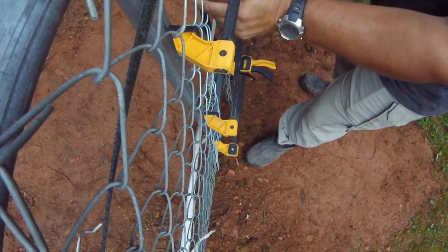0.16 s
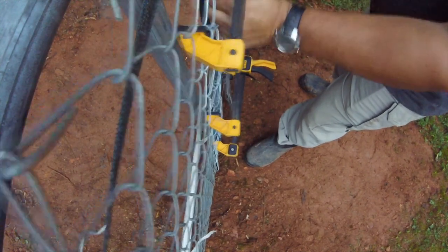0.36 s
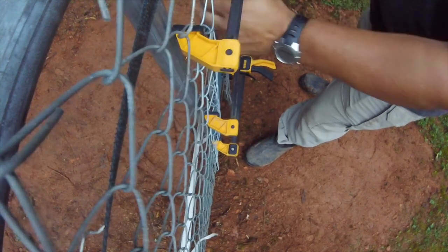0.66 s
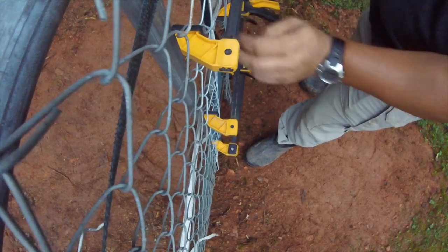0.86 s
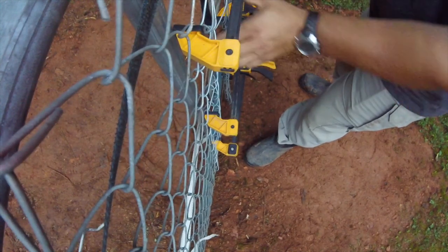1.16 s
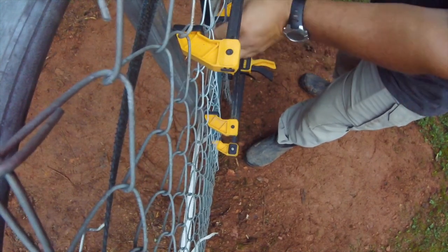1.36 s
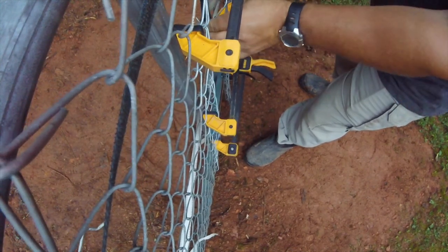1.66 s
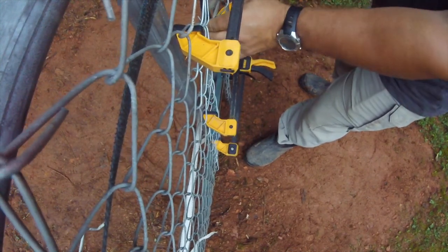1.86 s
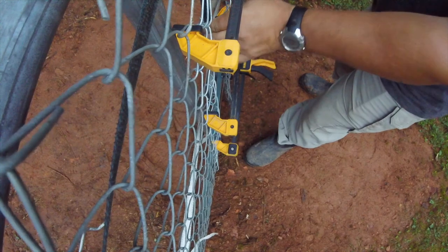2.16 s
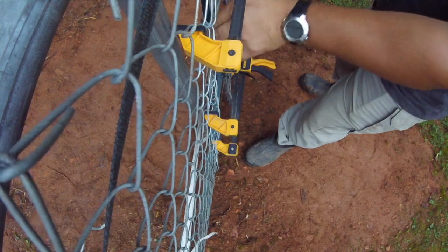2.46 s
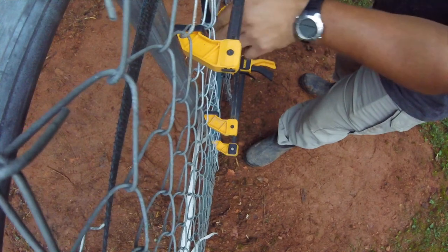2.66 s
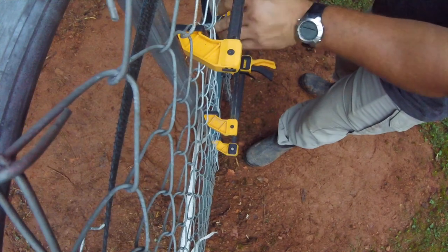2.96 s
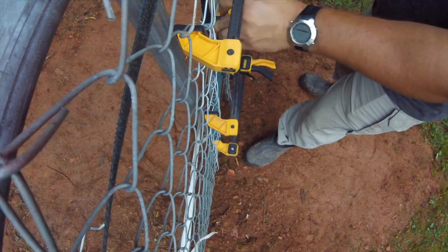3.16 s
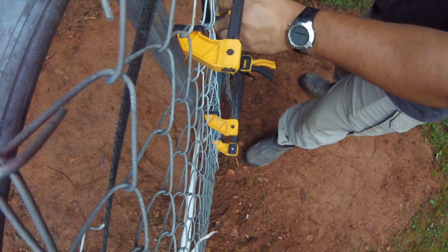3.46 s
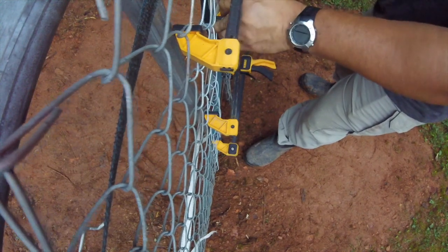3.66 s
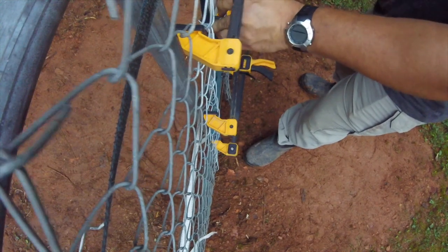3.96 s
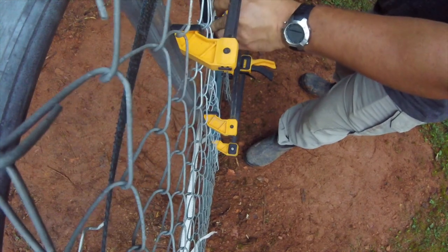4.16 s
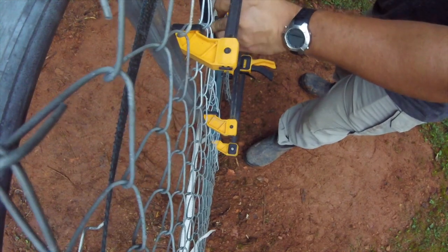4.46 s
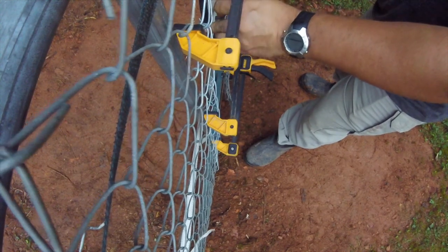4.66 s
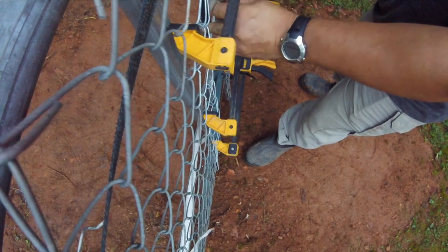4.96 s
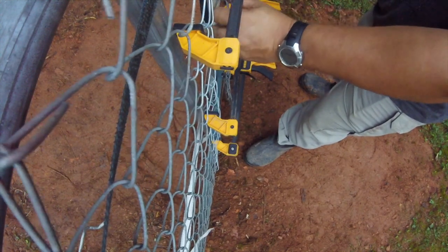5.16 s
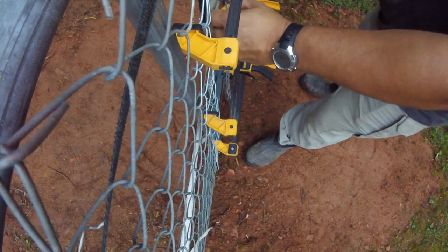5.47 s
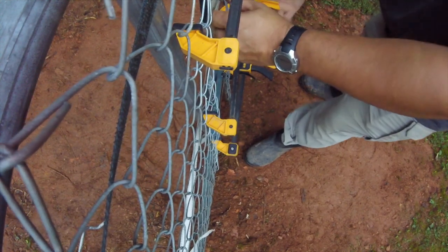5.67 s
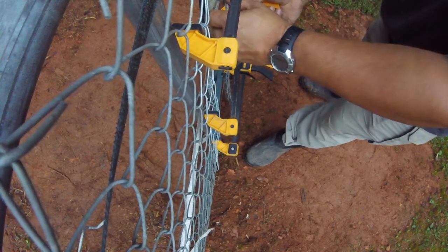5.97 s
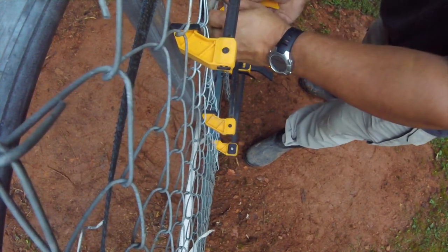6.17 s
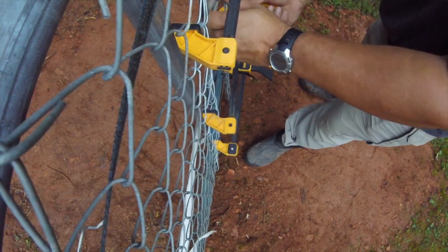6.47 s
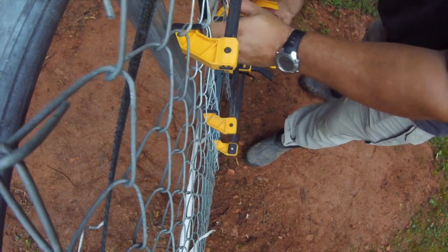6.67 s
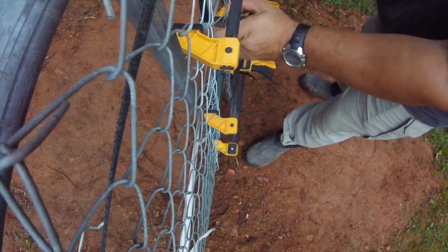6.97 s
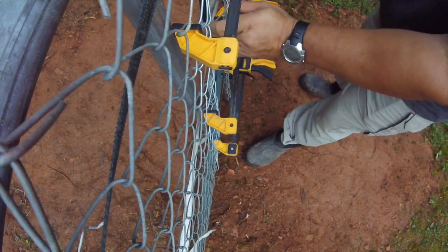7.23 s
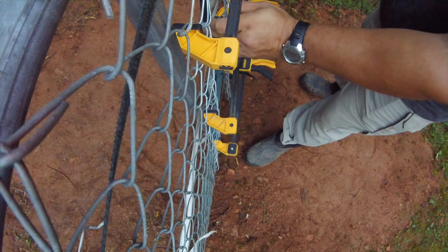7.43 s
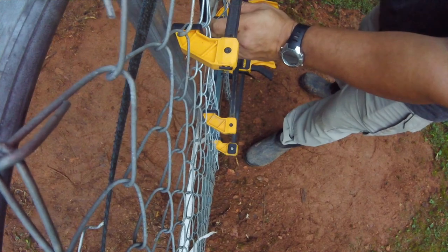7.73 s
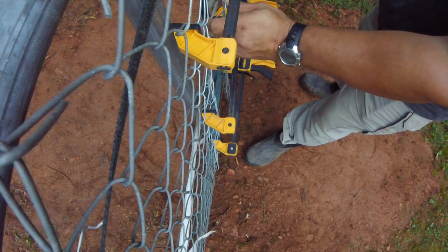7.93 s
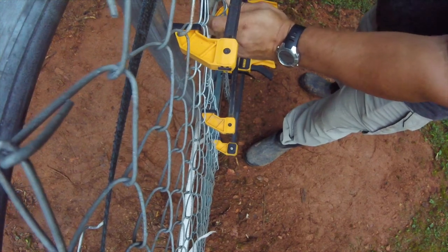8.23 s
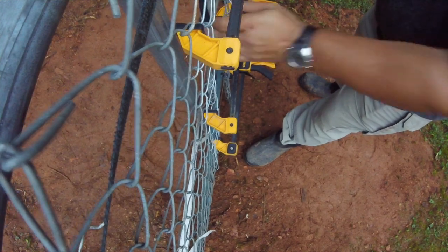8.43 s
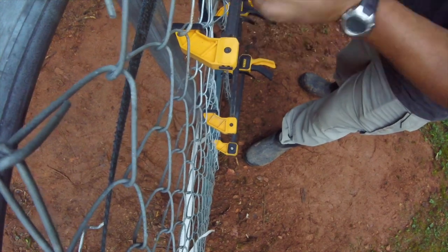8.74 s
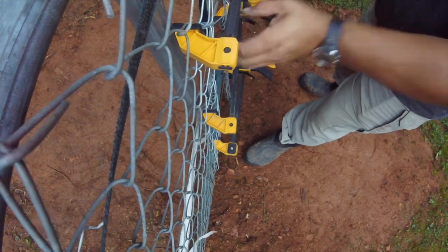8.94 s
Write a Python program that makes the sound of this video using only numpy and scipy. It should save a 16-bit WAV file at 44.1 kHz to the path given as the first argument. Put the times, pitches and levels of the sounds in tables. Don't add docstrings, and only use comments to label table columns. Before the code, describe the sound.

A hand jerks a wire mesh fence with a loud rattling clank and brief metallic ring, then scattered plastic clamp knocks, scrapes and low thumps follow.

```python
import sys
import numpy as np
from scipy import signal
from scipy.fft import rfft, irfft, next_fast_len
from scipy.io import wavfile
from scipy.ndimage import uniform_filter1d

SR = 44100
rng = np.random.default_rng(int(sys.argv[2]) if len(sys.argv) > 2 else 0)


def invert_db(x):
    u = np.asarray(x, float) / 20
    return 10 ** u


def put_to_file(sound):
    columns = np.atleast_2d(sound).T
    safe = np.clip(columns, -1, 1)
    whole_steps = np.round(safe * 32767)
    wavfile.write(sys.argv[1], SR, whole_steps.astype(np.int16))


N = 401310

# t/s, motion level/dB, rubbing level/dB
HANDS = [(0.0, -51, -75.5), (0.33, -38, -51), (0.61, -50, -67), (1.1, -56.5, -76), (1.67, -64, -77),
         (2.2, -54.5, -80.5), (2.56, -55.5, -78), (3.22, -57.5, -73.5), (3.6, -62.5, -81.5),
         (4.1, -54, -71.5), (4.55, -51, -76), (5.0, -57.5, -77.5), (5.65, -60, -75), (6.5, -48, -71),
         (7.2, -54.5, -77), (7.95, -50, -73.5), (8.45, -45, -70), (9.1, -50, -71)]
# t/s, depth/dB
PAUSES = [
    (3.4, 23),
    (4.0, 6.5),
    (4.68, 14),
    (6.92, 9.5),
    (7.33, 10.5),
    (7.83, 17),
]
# t/s, sway level/dB, post hum level/dB
PULLS = [(0.02, -33.5, -56), (0.33, -33.5, -49), (0.43, -34.5, -51.5), (0.9, -49.5, -72),
         (1.541, -48.5, -62), (1.86, -58.5, -70.5), (2.03, -56, -72), (2.291, -43.5, -71),
         (2.37, -42.5, -61), (2.71, -61, -65), (3.72, -48.5, -78), (3.95, -48, -63.5), (4.33, -57, -76),
         (4.51, -51, -62), (4.78, -67, -62.5), (4.887, -41, -55), (5.12, -49.5, -73), (5.35, -44.5, -73),
         (5.872, -40, -60.5), (6.13, -64, -76), (6.26, -42.5, -78), (6.362, -54, -61), (6.69, -62, -87),
         (7.632, -39, -86), (7.891, -41, -55), (8.138, -38, -58), (8.354, -33.5, -49.5), (8.52, -43.5, -54),
         (8.76, -44, -63), (9.0, -38, -61)]
# f/Hz, width/Hz, level/dB
SWAY_MODES = [(42, 27, -10), (66.5, 20.9, 2), (80, 29.5, 1.5), (114.8, 24.4, -3.5), (159.4, 35.7, -9.5)]
# f/Hz, width/Hz, level/dB
RUB_MODES = [(425.5, 42.3, -3), (650, 48, -12.5), (784, 100, -12), (929.4, 51, 0.5), (1039, 45, 2),
             (1141, 44, -10.5), (1241, 52, -3), (1590, 500, -23), (1900, 160, -15)]
# t/s, peak level/dB, f/Hz
JOLTS = [(0.243, -30, 93), (0.321, -22, 99), (2.282, -44, 89.6), (3.538, -43, 102), (5.836, -32.5, 61),
         (5.887, -35.5, 78.4), (6.228, -37.5, 80.6), (6.66, -38.5, 87), (6.955, -39.5, 81),
         (7.421, -36.5, 86.5), (7.512, -33, 83), (7.699, -34, 86.7), (8.107, -32, 102.3),
         (8.328, -24, 87.3), (8.374, -22, 99.7), (8.43, -37.5, 80.7), (8.476, -29, 79)]
# t/s, peak level/dB, brightness/dB, t60/s
SCUFFS = [(0.0, -53.5, -14, 0.28), (0.5, -61.5, -11, 0.2), (0.277, -47.5, -16, 0.18),
          (0.307, -43, -14, 0.15), (0.333, -32, -33, 0.056), (0.358, -43.5, -8, 0.06),
          (0.404, -30.5, -29, 0.087), (0.424, -38, -21, 0.03), (2.282, -59.5, -10, 0.21),
          (2.689, -65, -9, 0.24), (2.39, -57, -8.5, 0.066), (2.468, -63.5, -33, 0.1),
          (4.518, -60, -24, 0.29), (5.192, -62.5, -9, 0.25), (4.83, -65, -18, 0.062),
          (3.089, -67.5, -27, 0.23), (5.832, -55.5, -11, 0.078), (5.892, -66, -8, 0.28),
          (6.4, -41, -9.5, 0.14), (6.425, -49, -26, 0.3), (7.527, -61.5, -17, 0.093),
          (7.88, -55, -20, 0.36), (8.078, -50, -19, 0.32), (8.156, -54, -27, 0.07),
          (8.332, -50, -13.5, 0.31), (8.375, -44, -23, 0.19), (8.464, -48.5, -17.5, 0.19),
          (8.593, -55, -20, 0.26), (8.745, -60.5, -8, 0.29), (9.002, -58, -15.5, 0.25),
          (0.215, -58, -15, 0.17), (2.322, -62, -15, 0.092), (4.115, -64, -18, 0.17),
          (4.455, -60, -22, .12), (4.56, -63, -22, 0.092), (5.775, -64.5, -12, .2), (5.91, -65, -22, .2),
          (6.41, -51, -7.5, 0.19), (7.406, -67, -12, 0.14), (7.625, -62, -15, .15), (7.67, -65, -14, 0.13),
          (7.93, -60, -16, 0.18), (9.08, -57.5, -13, .1)]
# f/Hz, level/dB per Hz
SCRAPE_SPECTRUM = [(1100, -22), (1500, 8), (1850, 6), (3000, -5), (4200, -15.5), (5200, -4), (7000, -20.5),
                   (12000, -50)]
# f/Hz, level/dB per Hz
YARD_SPECTRUM = [(12, -39.5), (30, -1.5), (70, 1.5), (127, -1), (206, -21.5), (275, -10), (367, -32),
                 (540, -33.5), (1040, -29.5), (1410, -35.5), (2000, -55.5), (4400, -120)]
# f/Hz, level/dB per Hz
HISS_SPECTRUM = [(1200, -29), (1800, -3.5), (3000, -5.5), (4500, -10.5), (4850, -4.5), (6600, -7.5),
                 (8000, -6), (9600, -14.5), (11000, -13), (13400, -13.5), (15000, -46)]
# start t/s, end t/s, f/Hz, level/dB
CRICKETS = [(1.45, 1.8, 4240, -96), (2.65, 3.0, 4240, -93), (3.27, 3.648, 4270, -94),
            (3.3, 3.596, 4000, -95), (3.93, 4.35, 4170, -93), (4.583, 4.92, 4310, -91),
            (5.896, 6.297, 4310, -86.5), (7.38, 7.67, 4110, -92), (7.47, 7.64, 3870, -94),
            (7.67, 7.82, 4000, -90), (7.69, 7.95, 4320, -89), (8.64, 8.76, 4150, -92)]
# t/s, peak level/dB, colour f/Hz
SLIPS = [(0.2293, -60, 6860), (0.307, -48.5, 5100), (0.3288, -33, 7300), (0.351, -48, 5200),
         (0.372, -49, 5000), (0.388, -47, 5530), (0.4064, -36.5, 7100), (0.419, -44.5, 7260),
         (0.488, -57, 5410), (0.657, -57.5, 6460), (0.812, -57, 5330), (0.857, -62.5, 5850),
         (1.055, -65, 5500), (1.446, -60, 6400), (2.405, -61, 7500), (2.67, -56.5, 5000),
         (2.7105, -66, 4630), (3.0807, -68, 6510), (4.5241, -67, 6520), (5.198, -62, 5580),
         (5.4786, -63, 6580), (5.769, -63, 6440), (5.838, -63.5, 6400), (6.403, -62, 5200),
         (8.083, -57.5, 5800), (8.3686, -54, 5040), (8.457, -56, 5360), (8.5867, -58, 5330),
         (8.74, -58, 5200), (8.8975, -62.5, 5330), (8.996, -63.5, 4920), (9.0714, -64, 6370),
         (0.4385, -58, 6400), (0.472, -61, 7300), (0.525, -65, 4000), (0.58, -71, 5000), (0.725, -69, 4000),
         (0.99, -73, 4000), (1.039, -67, 4840), (1.147, -70, 5400), (1.22, -74, 5000), (1.3489, -70, 6380),
         (1.551, -72, 4000), (7.525, -69, 4600), (7.91, -69, 4500)]
# t/s, peak level/dB, colour f/Hz
SNAPS = [(1.5953, -69, 2640), (2.106, -64, 4770), (2.8726, -66, 4860), (3.652, -63.5, 1660),
         (4.15, -68, 5420), (4.202, -64, 3900), (5.0426, -65, 1890), (5.661, -70, 1660), (5.82, -61, 4300),
         (6.1838, -66, 1800), (6.56, -64.5, 1900)]
# f/Hz, level/dB per Hz
RUSTLE_SPECTRUM = [(1760, -4.5), (3000, -9.5), (4240, -16), (5220, -0.5), (6420, -1), (7740, -4),
                   (11100, -17.5), (14400, -56), (22000, -120)]
# t/s, peak level/dB, brightness/dB
BUMPS = [(0.218, -53, -21), (0.278, -38, -20), (2.282, -58, -11), (2.323, -49.5, -23), (2.377, -55, -16),
         (2.393, -52, -17), (2.462, -62, -13), (2.471, -53.5, -20), (2.523, -64, -21), (5.844, -56, -22),
         (5.89, -63, -22), (7.992, -62, -19), (8.088, -50, -19), (8.162, -48, -27), (8.184, -61, -26),
         (8.245, -56, -20), (8.287, -58, -17), (8.336, -44, -23), (8.377, -41, -20), (8.389, -40, -24),
         (8.451, -54, -19), (8.464, -46, -21), (8.539, -57, -21), (8.593, -52, -20), (8.741, -54, -12),
         (8.905, -60, -15), (8.94, -56, -25), (9.003, -56, -22), (9.08, -56, -13)]
# f/Hz, level/dB, t60/s
BUMP_LOW_MODES = [(149, -4, 0.025), (270, -2, .1), (428, 0, .08), (810, -3.5, .04), (927, -9.5, .04),
                  (1052, -6, .05)]
# f/Hz, level/dB, t60/s
BUMP_HIGH_MODES = [(1510, 6, .02), (1850, 4, .05), (1970, -10, 0.036), (2450, -5, .02)]
# t/s, peak level/dB, brightness/dB, low push/dB
KNOCKS = [(0.329, -32.5, -21, 6), (0.3992, -33, -10, 7), (0.424, -39, -5.5, 13), (0.872, -44, -17, -14),
          (1.437, -48, -18, 3), (4.051, -38.5, -13, 2), (4.21, -52, -22, 11.5), (4.306, -43.5, -13, 10),
          (4.494, -38.5, -15, 5.5), (4.887, -38, -17, -6), (5.059, -44.5, -14.5, 10),
          (5.345, -34, -14, 4.5), (5.967, -43, -22.5, 6.5), (6.046, -37, -14, 2), (6.136, -42, -15, 6),
          (6.267, -51, -25, -8), (6.354, -34.5, -13, 2), (6.387, -45, -21, 12.5), (7.11, -43.5, -18, 7.5),
          (7.863, -39, -14.5, 3.5)]
# f/Hz, level/dB, t60/s
HOUSING_MODES = [(271.6, -6, 0.23), (430, 0, 0.1), (570, -2.5, 0.048), (703, -8, 0.04), (770, -10.5, 0.064),
                 (942.5, 7, 0.042), (1030, -20.5, 0.085), (1157, -33, 0.1), (1196, -22, 0.094)]
# f/Hz, level/dB, t60/s
CLAMP_MODES = [(1607, 4, 0.028), (1788, 5.5, 0.038), (1900, -25, 0.024), (2420, -4.5, 0.017),
               (2760, -10, 0.045), (2913, 11, 0.017), (2763, -22, 0.22), (3000, 4.5, 0.01),
               (3660, -9, 0.015)]
# t/s, low ring level/dB, high ring level/dB
BAR_HITS = [
    (0.3296, -62, -43),
    (0.361, -60, -60),
    (0.4066, -72, -47),
    (0.4255, -55, -56),
]
# f/Hz, level/dB, t60/s
BAR_LOW_MODES = [(2676, 0, .62), (2686, -1, .2), (2795, -9, .1), (3040, -14, .1), (3316, -12, .07)]
# f/Hz, level/dB, t60/s
BAR_HIGH_MODES = [(5216, -12, .1), (5620, -20, .12), (6455, -19, .15), (6713, -19, .12), (7187, -11, .07),
                  (7546, 0, .26), (7526, -2, .1), (7650, -8, .12), (7790, -13, .1), (8317, -11, .08),
                  (8484, -19, .12), (9706, -15, .06)]
# t/s, peak level/dB, f/Hz
TAPS = [(0.995, -73, 660), (1.065, -69.5, 640), (1.192, -72, 660), (1.529, -71, 660), (1.573, -76, 402),
        (2.03, -74, 665), (2.179, -71, 428), (2.612, -69, 428), (3.877, -70, 650), (4.735, -71, 650),
        (8.251, -65, 437), (5.846, -58, 430), (5.892, -58.5, 430), (5.9, -55, 275), (2.285, -47, 135),
        (2.38, -65, 830), (2.522, -77, 1000), (6.105, -79, 1800), (6.37, -58, 270), (5.84, -70, 1890),
        (4.2, -72.5, 1800), (5.352, -54, 428), (6.05, -63, 430)]
# t/s, peak level/dB, f/Hz
PINGS = [
    (4.4, -88, 2800),
    (6.67, -88, 2770),
    (8.42, -83.5, 2720),
    (8.555, -82, 2700),
]

PULL_RISE_DB_PER_S, SWAY_FALL_DB_PER_S, HUM_FALL_DB_PER_S = 264, 177.5, 82
HUM_BELOW_MOTION_DB, PAUSE_HALF_S = 18, 0.13
JOLT_T60_S = 0.16
SHIVER_DB, SHIVER_BRIGHT_DB, SHIVER_T60_S = -16, -17.5, 0.11
YARD_DB, HISS_DB, CHORUS_DB = -62, -85.5, -87.5
CRICKET_RISE_HZ_PER_S = 200.0
RUSTLE_DB, CALM_FROM_S, CALM_TO_S, CALM_DB = -77.5, 0.73, 2.6, 24
WIRE_RING_DB, WIRE_RING_T60_S = -17, 0.05
SQUEAK_S, SQUEAK_LENGTH_S, SQUEAK_HZ, SQUEAK_DB = 4.418, 0.066, 1120, -65.5


def seconds(length):
    return np.arange(length) / SR


def rms_one(x):
    return x / np.sqrt(np.mean(x ** 2) + 1e-20)


def in_time(rows):
    s, *columns = np.transpose(rows)
    return [np.interp(seconds(N), s, c) for c in columns]


def drift(rate_hz):
    r = np.exp(-80 * np.pi * rate_hz / SR)
    noise = rng.standard_normal(N // 40 + 2002)
    slow = signal.lfilter([1], [1, -2 * r, r * r], noise)[2000:]
    return np.interp(np.arange(N) / 40, np.arange(len(slow)), rms_one(slow))


def ring(clicks, hz, t60_s):
    r = invert_db(-60 / (t60_s * SR))
    w = 2 * np.pi * hz / SR
    return signal.lfilter([0, np.sin(w)], [1, -2 * r * np.cos(w), r * r], clicks + 1e-18)


def resonate(x, hz, width_hz):
    r = np.exp(-np.pi * width_hz / SR)
    zeros = np.array([1, 0, -1]) * (1 - r * r) / 2
    return signal.lfilter(zeros, [1, -2 * r * np.cos(2 * np.pi * hz / SR), r * r], x)


def lowpass(x, hz, order):
    return signal.sosfilt(signal.butter(order, hz, fs=SR, output="sos"), x)


def coloured(spectrum):
    hz, level_db = np.transpose(spectrum)
    size = next_fast_len(N)
    bins_hz = np.maximum(np.arange(size // 2 + 1) * SR / size, 1)
    shape = invert_db(np.interp(np.log(bins_hz), np.log(hz), level_db))
    return rms_one(irfft(rfft(rng.standard_normal(size)) * shape, size)[:N])


def grains(per_s, spread_db):
    sizes = invert_db(spread_db * np.minimum(rng.exponential(1, N), 5))
    signs = rng.choice([-1, 1], N)
    return sizes * signs * (rng.random(N) < per_s / SR)


def strike(times, peak_db, modes, scatter_db):
    at = np.round(np.array(times) * SR).astype(int)
    luck = rng.standard_normal((len(at), len(modes)))
    out = np.zeros(N)
    for k, (hz, level_db, t60_s) in enumerate(modes):
        clicks = np.zeros(N)
        clicks[at] = invert_db(np.array(peak_db) + level_db + scatter_db * luck[:, k])
        out += ring(clicks, hz, t60_s)
    return out


def add(out, s, piece):
    i = round(s * SR)
    out[i:i + len(piece)] += piece[:N - i]


def evened(x, span_s):
    power = uniform_filter1d(x ** 2, round(span_s * SR))
    return rms_one(x / (power + 1e-12) ** 0.22)


def rubbed(x, low_db):
    out = 0
    for k, (hz, width_hz, level_db) in enumerate(RUB_MODES):
        gain = invert_db(level_db + low_db * (hz < 880) + 5.04 * drift(8.7))
        out = out + gain * (-1) ** k * resonate(resonate(x, hz, width_hz), hz, 3 * width_hz)
    return out


def swells(times, peak_db, fall_db_per_s):
    out = np.zeros(N)
    t = np.arange(-SR // 4, SR // 2) / SR
    shape = invert_db(np.minimum(PULL_RISE_DB_PER_S * t, -fall_db_per_s * t))
    for s, level_db in zip(times, peak_db):
        at = round(s * SR) - SR // 4 + np.arange(len(t))
        inside = (at >= 0) & (at < N)
        out[at[inside]] = np.maximum(out[at[inside]], invert_db(level_db) * shape[inside])
    return out


def fence():
    move_db, rub_db = in_time(HANDS)
    t = seconds(N)
    still_db = sum(depth_db * np.clip(1 - np.abs(t - s) / PAUSE_HALF_S, 0, 1) for s, depth_db in PAUSES)
    s, sway_db, hum_db = np.transpose(PULLS)
    motion_db = move_db - still_db
    swing = np.hypot(invert_db(motion_db), swells(s, sway_db, SWAY_FALL_DB_PER_S))
    drone = np.hypot(invert_db(motion_db - HUM_BELOW_MOTION_DB), swells(s, hum_db, HUM_FALL_DB_PER_S))

    pushes = signal.lfilter([0.02], [1, -0.98], grains(120, spread_db=3.5))
    sway = 0
    for k, (hz, width_hz, level_db) in enumerate(SWAY_MODES):
        sway = sway + invert_db(level_db) * resonate(pushes, hz, width_hz) * (-1) ** k
    hum = resonate(resonate(grains(150, spread_db=2.0), 262.8, 30), 272.6, 90)
    rub = evened(rubbed(grains(700, spread_db=2.0), low_db=5.5), 0.029)
    rub = rub + invert_db(-18.5) * coloured(SCRAPE_SPECTRUM)

    out = invert_db(-3.5) * swing * evened(sway, 0.067)
    out += invert_db(3.5) * drone * evened(hum, 0.13)
    return out + invert_db(rub_db - still_db - 4.0 + 2.04 * drift(4.4)) * rub


def scuffs():
    press, bright = np.zeros(N), np.zeros(N)
    t = seconds(SR // 2)
    shivers = [(s + 0.0016, db + SHIVER_DB, SHIVER_BRIGHT_DB, SHIVER_T60_S) for s, db, *_ in KNOCKS]
    for s, peak_db, bright_db, t60_s in list(SCUFFS) + shivers:
        swell = invert_db(peak_db - 60 * t / t60_s) * (1 - np.exp(-t / 0.0019))
        add(press, s, swell * (1 + 2.5 * np.exp(-t / 0.00079)))
        add(bright, s, swell * invert_db(bright_db))
    drive = evened(grains(2500, spread_db=1.5), 0.0055)
    scrape = invert_db(-5.0 + 2.3 * drift(98)) * bright * coloured(SCRAPE_SPECTRUM)
    return invert_db(10.5) * rubbed(press * drive, low_db=10.5) + scrape


def yard():
    out = invert_db(YARD_DB) * coloured(YARD_SPECTRUM)
    out += invert_db(HISS_DB + 1.24 * drift(12) + 0.83 * drift(1.6)) * coloured(HISS_SPECTRUM)
    chorus = resonate(resonate(rng.standard_normal(N), 6610, 310), 6330, 700)
    return out + invert_db(CHORUS_DB + 2.0 * drift(24)) * rms_one(chorus)


def wires():
    out = np.zeros(N)
    t = seconds(SR // 5)
    for s, peak_db, hz in SLIPS:
        lumps = invert_db(3.3 * rng.standard_normal(len(t) // 44 + 1)).repeat(44)[:len(t)]
        crackle = rng.standard_normal(len(t)) * lumps
        hard = np.clip((peak_db + 50) / 22, 0, 1)
        band_hz = [3800 - 1300 * hard, 9000 + 1800 * hard]
        burst = signal.sosfilt(signal.butter(2, band_hz, "band", fs=SR, output="sos"), crackle)
        burst = rms_one(burst + 2.0 * resonate(crackle, hz, 820))
        rise = 1 - np.exp(-t / (0.0003 + 0.00059 * (1 - hard)))
        fall = invert_db(-60 * t / 0.083) + 0.29 * invert_db(-60 * t / 0.23)
        add(out, s, invert_db(peak_db - 11.5) * burst * rise * fall)
    for s, peak_db, hz in SNAPS:
        spark = rng.standard_normal(len(t)) * invert_db(-60 * t / 0.046)
        snap = resonate(spark, hz, 0.5 * hz)
        add(out, s, invert_db(peak_db + 0.5) * snap / np.abs(snap).max())
    clock = seconds(N)
    calm = np.clip(np.minimum(clock - CALM_FROM_S, CALM_TO_S - clock) / 0.11, 0, 1)
    rustle_db = RUSTLE_DB - CALM_DB * calm - 6 + 2.64 * drift(25)
    out += invert_db(rustle_db) * coloured(RUSTLE_SPECTRUM)
    return signal.sosfilt(signal.cheby2(10, 45, 11700, fs=SR, output="sos"), out)


def bumps():
    s, peak_db, bright_db = np.transpose(BUMPS)
    low = strike(s, peak_db - 10.5, BUMP_LOW_MODES, scatter_db=5.0)
    high = strike(s, peak_db + bright_db - 9.5, BUMP_HIGH_MODES, scatter_db=4.0)
    return lowpass(low, 1250, order=4) + lowpass(high, 2500, order=4)


def wire_rings():
    out = np.zeros(N)
    t = seconds(SR // 5)
    luck = rng.random((len(SLIPS), 3, 6, 1))
    for (s, peak_db, _), (pitch, size, length) in zip(SLIPS, luck):
        fade_db = -60 * t / (WIRE_RING_T60_S * (0.5 + 1.56 * length))
        level = invert_db(peak_db + WIRE_RING_DB - 11 * size + fade_db)
        modes = level * np.sin(2 * np.pi * 3900 * 2.5 ** pitch * t)
        add(out, s, modes.sum(axis=0) * (1 - np.exp(-t / 0.0004)))
    return out


def jolts():
    out = np.zeros(N)
    t = seconds(SR // 2)
    for s, peak_db, hz in JOLTS:
        swell = invert_db(peak_db + 1.5 - 60 * t / JOLT_T60_S) * (1 - np.exp(-t / 0.011))
        add(out, s, swell * np.sin(2 * np.pi * hz * t))
    return out


def clamp():
    s, peak_db, bright_db, push_db = np.transpose(KNOCKS)
    s = s + 0.0008
    out = strike(s, peak_db - 7.5, HOUSING_MODES, scatter_db=1.16)
    out += strike(s, peak_db + bright_db - 8, CLAMP_MODES, scatter_db=3.0)
    bounce_s = s + 0.00431 + 0.00043 * rng.standard_normal(len(s))
    out += strike(bounce_s, peak_db - 12.5, HOUSING_MODES, scatter_db=2.0)
    out += strike(bounce_s, peak_db + bright_db - 23, CLAMP_MODES, scatter_db=7.0)
    recoil_modes = [(105, -3.5, 0.05), (150, -4.0, 0.025)]
    out -= strike(s, peak_db + push_db - 4, recoil_modes, scatter_db=1.5)
    crack_modes = [(5040, -5.0, 0.018), (6400, -1.0, 0.0093)]
    crack = strike(s, peak_db + bright_db - 19.0, crack_modes, scatter_db=7.5)
    return lowpass(out, 2900, order=6) + lowpass(crack, 7400, order=4)


def bar():
    s, low_db, high_db = np.transpose(BAR_HITS)
    rings = strike(s, low_db, BAR_LOW_MODES, scatter_db=1.5)
    rings += strike(s, high_db, BAR_HIGH_MODES, scatter_db=1.0)
    return rings * invert_db(0.8 * drift(21))


def taps():
    out = np.zeros(N)
    t = seconds(SR // 2)
    for rows, t60_s in ((TAPS, 0.09), (PINGS, 0.25)):
        for s, peak_db, hz in rows:
            swell = invert_db(peak_db + 6.5 - 60 * t / t60_s) * (1 - np.exp(-t / 0.0012))
            add(out, s, swell * np.sin(2 * np.pi * hz * t))
    return out


def crickets():
    out = np.zeros(N)
    t = seconds(N)
    throb = 0.65 + 0.35 * np.sin(2 * np.pi * 38 * t + 0.6 * drift(4))
    broken_db = 2.5 * drift(15)
    for start, end, hz, level_db in CRICKETS:
        swell = np.sqrt(np.clip(1 - ((2 * t - start - end) / (end - start)) ** 2, 0, 1))
        glide = CRICKET_RISE_HZ_PER_S * (t - (start + end) / 2) ** 2 / 2
        cycles = hz * t + glide + np.cumsum(15 * drift(18)) / SR
        out += invert_db(level_db + broken_db) * swell * throb * np.sin(2 * np.pi * cycles)
    return out


def squeak():
    t = seconds(N) - SQUEAK_S
    held = np.clip(np.minimum(t / 0.0046, (SQUEAK_LENGTH_S - t) / 0.022), 0, 1)
    drag = grains(3000, spread_db=1.5)
    tone = resonate(resonate(drag, SQUEAK_HZ, 400), SQUEAK_HZ, 400)
    return invert_db(SQUEAK_DB) * held * rms_one(tone)


def scene():
    mount = signal.butter(3, 50, "high", fs=SR, output="sos")
    felt = signal.sosfilt(mount, fence() + jolts() + clamp())
    contacts = scuffs() + bumps() + taps() + squeak()
    metal = wires() + lowpass(wire_rings(), 11000, order=8) + lowpass(bar(), 11500, order=12)
    return (felt + contacts + metal + yard() + crickets())[None]


def band_limit(x):
    return signal.sosfilt(signal.butter(12, 13460, fs=SR, output="sos"), x)


def record(dry):
    return band_limit(dry)


dry = scene()
out = record(dry)
put_to_file(out)
```